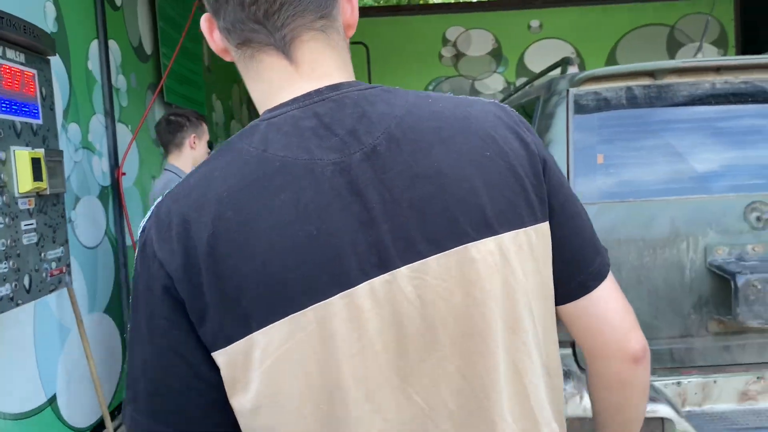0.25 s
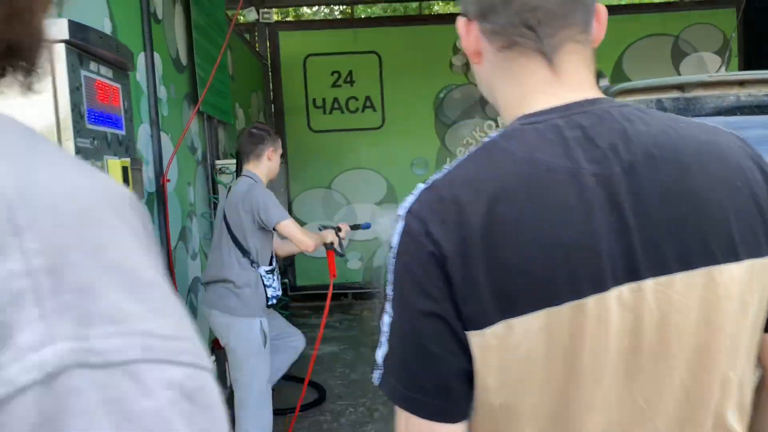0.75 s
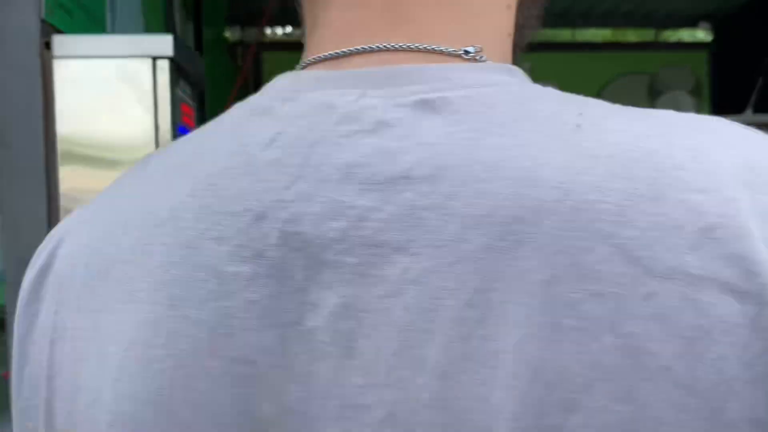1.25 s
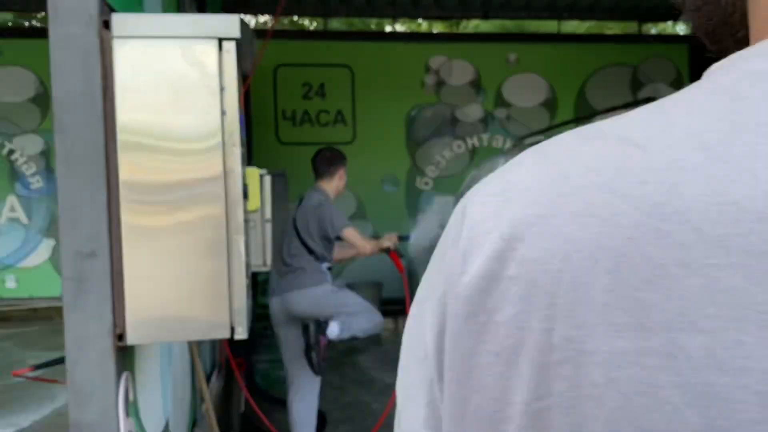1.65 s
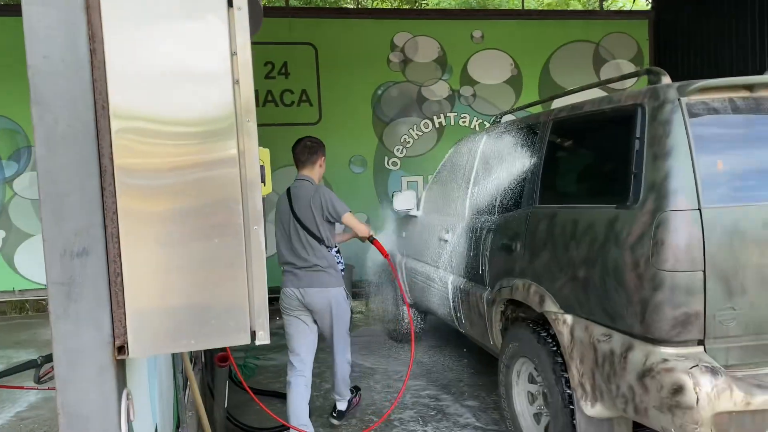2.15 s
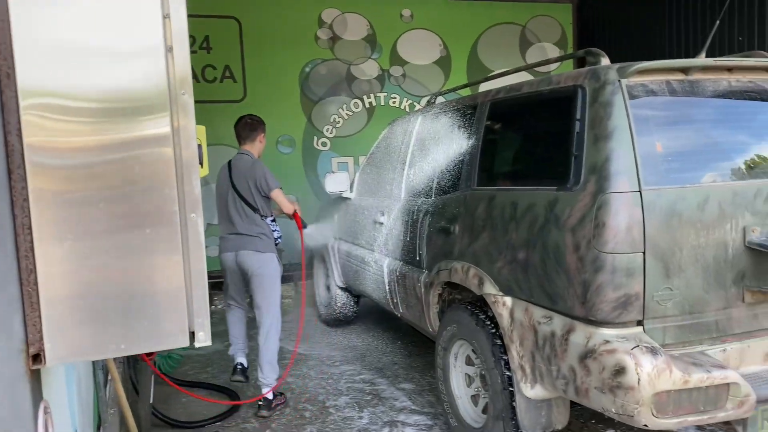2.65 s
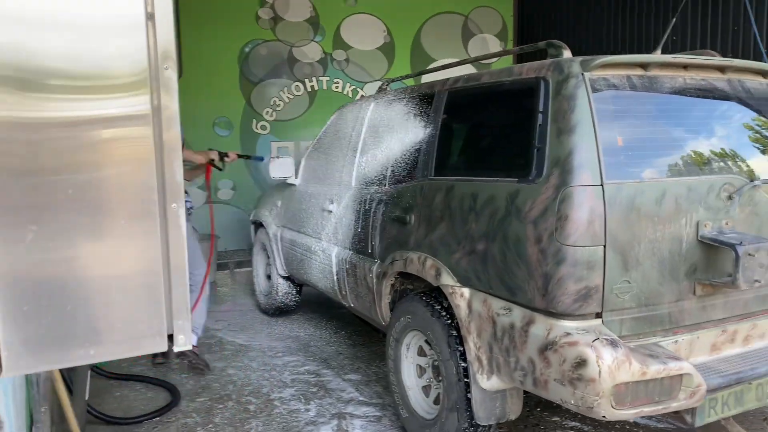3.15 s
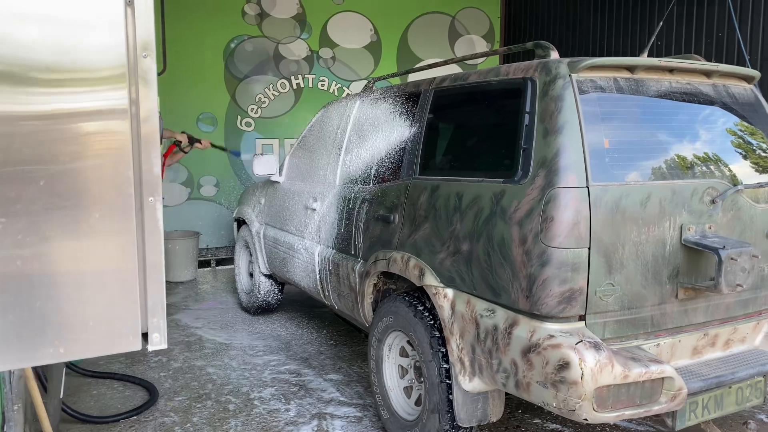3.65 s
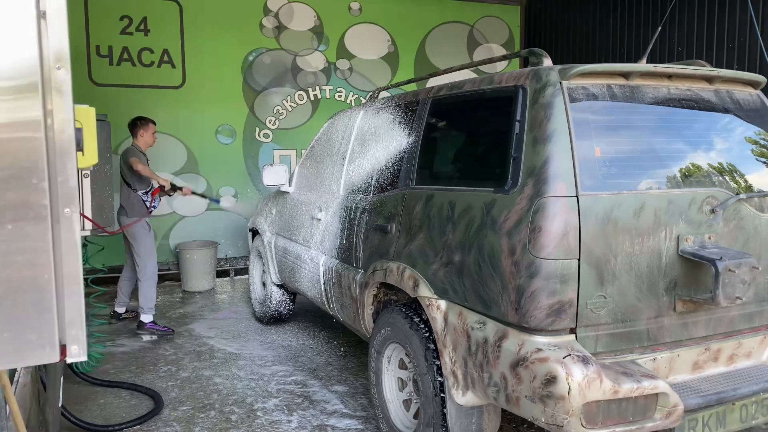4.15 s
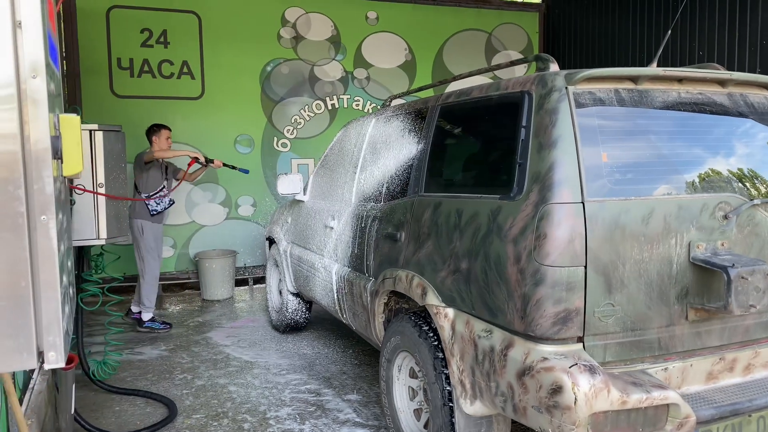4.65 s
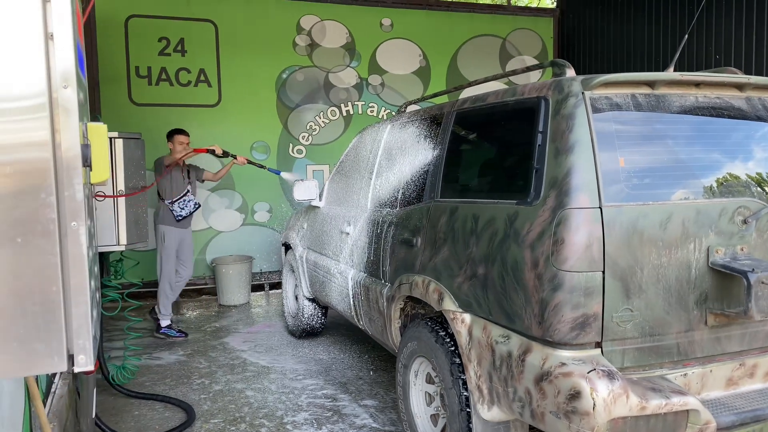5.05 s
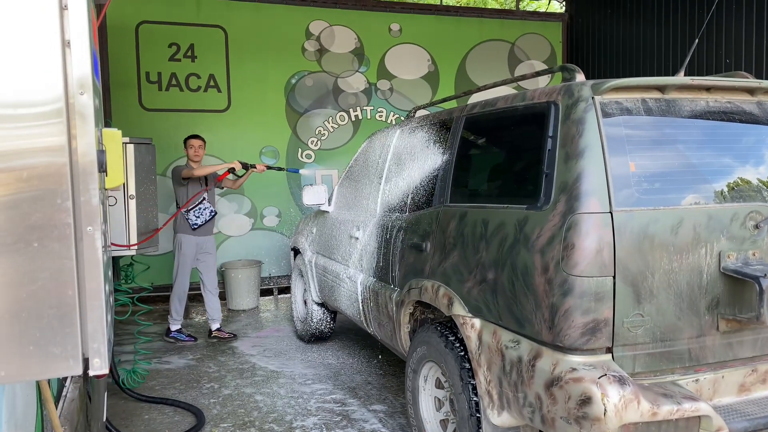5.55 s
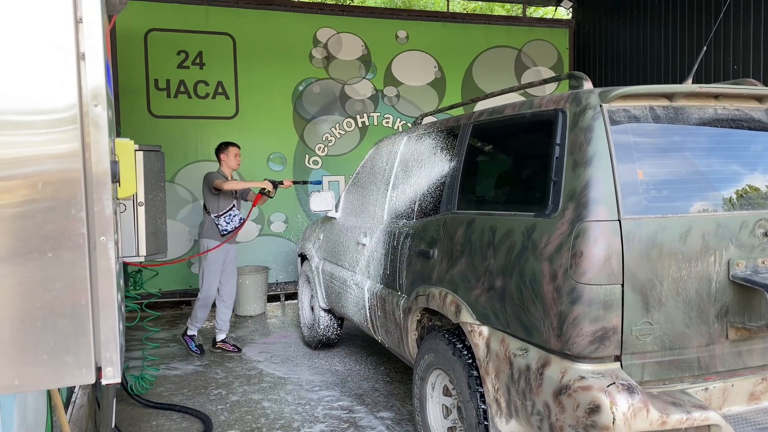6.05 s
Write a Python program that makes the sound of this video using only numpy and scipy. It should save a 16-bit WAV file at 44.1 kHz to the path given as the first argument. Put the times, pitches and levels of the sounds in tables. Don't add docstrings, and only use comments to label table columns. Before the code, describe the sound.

At an open self-service wash bay, a pressure lance sprays a car with a bright, dense hiss, fizzing at the nozzle and hooting faintly in its tube. A plunger pump thuds and hums beneath. The spray stops briefly early on, resumes for a long stretch, then cuts twice more near the end, the pump easing each time. Stereo phone pickup from several metres, with short wall reflections.

```python
import sys
import numpy as np
from scipy import signal
from scipy.io import wavfile
from scipy.ndimage import uniform_filter1d

SR = 44100
rng = np.random.default_rng(int(sys.argv[2]) if len(sys.argv) > 2 else 0)


def waveform_to_disk(signal):
    frames = np.transpose(np.atleast_2d(signal))
    scaled = np.clip(frames, -1, 1) * 32767
    samples = np.round(scaled).astype(np.int16)
    wavfile.write(sys.argv[1], SR, samples)


def ratio(d):
    e = np.asarray(d, float) / 20
    return 10 ** e


N = 278712

# (frequency [Hz], density [dB per Hz])
YARD_SPECTRUM = [(25, -45), (45, -12), (140, -4.5), (250, -8.5), (600, -19), (1400, -23), (4000, -30),
                 (8000, -36), (12000, -43), (13200, -70), (16000, -90)]
# (time [s], level [dB], length [s])
YARD_SWELLS = [
    (.08, 13, .14),
    (1.06, -5, .14),
    (6.05, 3, .2),
]
# (frequency [Hz], density [dB per Hz])
RUMBLE_SPECTRUM = [(25, -55), (42, -22), (70, -7), (140, -7), (200, 0), (400, -1.5), (850, -8.5),
                   (1800, -31.5), (6000, -36), (16000, -62)]
# (shaft order [1], level [dB])
PLUNGER_ORDERS = [(3, 0), (6, -34)]
# (shaft order [1], level [dB])
MOTOR_ORDERS = [(4, 0), (5, -1.2)]
# (shaft order [1], level [dB])
KNOCK_ORDERS = [(7, -4), (8, 1), (9, 0.5), (10, -2), (11, -9), (12, -4), (13, -16), (14, -11.5),
                (15, -16.5), (16, -24), (17, -5), (18, -16.5), (19, -17.5), (20, -11.5), (21, -16.5),
                (22, -15)]
# (lift [s], reseat [s], time to load up [s], surge just before [dB])
UNLOADS = [
    (.76, 1.14, .12, 0),
    (4.645, 4.86, .06, 3.5),
    (6.0, 6.3, .05, 3.5),
]
# (time [s], level [dB])
PUMP_PATH = [(0.0, 5), (.1, 4), (.2, 3), (.4, -1), (.6, 3), (.72, 2), (.82, 6), (1.06, -7), (1.17, 7),
             (1.3, 2), (2.3, 2.5), (3.3, -.5), (3.8, -1), (4.15, 1), (4.55, -1), (4.78, -4), (4.86, 2),
             (5.05, -2.5)]
# (time [s], level [dB], length [s])
MOTOR_SWELLS = [
    (.08, 4, .08),
    (1.08, -13, .17),
    (3.15, -10, .5),
    (4.62, 3, .15),
    (4.88, -11, .03),
]
# (time [s], peak [dB])
SPITS = [
    (4.842, -14),
    (6.308, -12),
]
# (time [s], peak [dB], frequency [Hz], t60 [s])
THUMPS = [
    (0.046, -20, 61, 0.34),
    (.13, -24, 64, 0.4),
    (4.879, -28, 57.5, .3),
    (5.899, -30, 421, 0.94),
    (5.9, -34, 644, 0.47),
    (6.02, -37, 473, 0.6),
    (6.09, -35, 328, 0.56),
    (6.16, -35, 353, .5),
]
# (open [s], let go [s], pressure missing at first [dB], time to build [s])
PULLS = [
    (-1.0, 0.765, -10, .05),
    (1.13, 4.503, -25, .085),
    (4.841, 5.855, -5, .04),
    (6.308, 7.0, -13, .015),
]
# (time [s], strength on panels [dB], tube pitch [Hz], panel hollowness [dB])
SWEEP = [(0.0, -21.5, 715, 2), (.23, -23.3, 735, 0), (.39, -26.7, 735, 2), (.52, -24.3, 737, 0),
         (.75, -25.7, 740, -2), (1.3, -27.2, 715, 3), (1.7, -26, 737, 0), (2.0, -24.8, 705, 0),
         (2.35, -23, 722, -1), (2.6, -24.5, 740, 0), (2.9, -24.2, 735, -.5), (3.38, -25.5, 697, 1),
         (4.1, -26.3, 712, 0), (4.5, -24, 712, -1), (4.9, -26.5, 712, 2), (5.1, -26, 715, 0),
         (5.6, -26.5, 713, 1), (5.9, -27, 665, 5.5)]
# (frequency [Hz], density [dB per Hz])
SPLASH_SPECTRUM = [(1120, -40), (1900, -10.5), (2640, 0.5), (2910, 2), (3220, -1), (4310, -1.5),
                   (5790, -12.5), (6600, -14.5), (8580, -27), (14500, -120)]
# (frequency [Hz], density [dB per Hz])
DRUM_SPECTRUM = [(490, -32), (830, -1), (1010, -5), (1170, -8.5), (1460, -4), (1720, -10), (1900, -10.5),
                 (2470, -21), (4180, -120)]
# (frequency [Hz], density [dB per Hz])
FIZZ_SPECTRUM = [(4000, -28), (5800, 5), (7000, 1.5), (9000, 5), (11000, 4.5), (13000, 3.5), (15000, 0.5),
                 (17000, -26.5)]
# (time [s], level [dB], length [s])
FIZZ_FLARES = [(1.43, 3, .05), (1.95, 4, .04), (3.0, 3, .08), (3.19, -7, .03), (3.28, 6, .07),
               (3.77, 8, .05), (4.13, 7, .12), (4.35, 5, .04), (4.85, 6, .03), (5.07, 5, .05),
               (5.8, 2, .08), (6.07, 6, .07), (6.31, 10, .008)]
# (time [s], level [dB], length [s])
HOOT_GULPS = [(.38, 6, .04), (.47, 8, .025), (.6, -3, .06), (1.67, 5, .09), (2.1, 6, .16), (2.5, 3, .1),
              (2.66, -7, .03), (2.84, 3, .05), (3.1, 3, .1), (3.56, 3, .04), (3.77, 4, .03), (4.16, 3, .06),
              (4.52, 11, .045), (4.88, 4, .04), (5.53, 4, .04), (5.84, 5, .04), (6.32, 12, .02)]
# (delay [s], gain [1])
WALLS = [(.0031, 0.21), (.0074, -0.22), (0.012, .3), (.0187, .25), (0.0253, -0.15), (.0371, 0.24)]
# (frequency [Hz], left-right likeness [1])
LIKENESS = [(60, 0.3), (200, 1.1), (400, 0.7), (700, 0.2), (1300, -0.3), (3000, 0.12), (5000, -0.28),
            (7000, .42), (8400, .6), (9300, .8), (11000, .97), (15000, .95)]
# (frequency [Hz], left minus right [dB])
BALANCE = [(60, 9), (130, 1.5), (290, -3), (640, 6), (1410, 0.5), (3100, 3), (6820, 4.5), (15000, -3)]

YARD_DB = -44.5
IDLE_HZ, SAG_HZ = 24.45, 0.6
IDLE_DB, LIFT_S, SURGE_S = -12.5, 0.06, 0.05
PLUNGER_DB, KNOCK_DB, MOTOR_DB, RUMBLE_DB = -32.5, -32.3, -40.5, -36.3
ROCK_DB = -45.5
KNOCK_LOAD, MOTOR_LOAD, RUMBLE_LOAD = 0.8, -0.25, 0.5
PLUNGER_PATH, MOTOR_PATH, RUMBLE_PATH = 0.3, 0.3, 0.7
KNOCK_LEAD_RAD = 2.4
KNOCK_ECHO = 0.75
BLEED_DB_PER_S, KNEE_S = 118, 0.025
FIZZ_SHARE, HOOT_SHARE, DRUM_SHARE = 1.45, 0.85, 0.72
FIZZ_DB, HOOT_DB, DRUM_DB = -11.5, -9.5, -12.5
PANELS_LEAD_S, PANELS_STEP_HZ = 0.0004606, 0
NOZZLE_LEAD_S, NOZZLE_STEP_HZ = -0.00025, 11020
TREBLE_HZ, TOP_HZ = 6000, 15750


def evened(x):
    return x / np.sqrt(np.mean(x ** 2) + 1e-20)


def read(points, hz):
    f, value = np.transpose(points)
    return np.interp(np.log(hz + 1), np.log(f + 1), value)


def add(mix, s, sound):
    part = mix[..., round(s * SR):][..., :sound.shape[-1]]
    part += sound[..., :part.shape[-1]]


def drift(hz, count):
    t = np.arange(0, N + 64, 64) / SR
    turns = np.geomspace(hz / 10, hz, 16)[:, None] * t + rng.random((count, 16, 1))
    wander = np.sin(2 * np.pi * turns).sum(1) / np.sqrt(8)
    return np.repeat(wander, 64, 1)[:, :N]


def swells(rows):
    t = np.arange(N) / SR
    return sum(db * np.exp(-((t - s) / length_s) ** 2) for s, db, length_s in rows)


def hiss(spectrum, patchy_db, flicker_db, size, aimed=1):
    frames, hz = 4 * N // size + 5, np.fft.rfftfreq(size, 1 / SR)
    a, b, c, d, patches = rng.standard_normal((frames, len(hz), 5)).T
    patches = uniform_filter1d(patches, size=size // 80, axis=0)
    patches = evened(uniform_filter1d(patches, size=8000 // size, axis=1))
    flicker = evened(uniform_filter1d(rng.standard_normal(frames), size=3))

    same = np.clip(read(LIKENESS, hz), 0, 1)[:, None]
    lead_s = np.where(hz < TREBLE_HZ, PANELS_LEAD_S, NOZZLE_LEAD_S)
    step_hz = np.where(hz < TREBLE_HZ, PANELS_STEP_HZ, NOZZLE_STEP_HZ)
    early = np.exp(2j * np.pi * (hz - step_hz) * lead_s * aimed)[:, None]
    right = a + 1j * b
    left = same * early * right + np.sqrt(1 - same ** 2) * (c + 1j * d)

    half_db = read(BALANCE, hz) / 2
    port_db = np.array([half_db, -half_db]) + read(spectrum, hz)
    z = np.array([left, right]) * ratio(port_db)[:, :, None]
    z *= ratio(patchy_db * patches + flicker_db * flicker)
    out = signal.istft(z, nperseg=size, noverlap=3 * size // 4)[1][:, :N]
    return out / np.sqrt(np.mean(out.mean(0) ** 2))


def yard():
    noise = hiss(YARD_SPECTRUM, 1.23, 1.2, size=1024, aimed=0)
    return ratio(YARD_DB + swells(YARD_SWELLS)) * noise


def pump_load_db():
    t, out = np.arange(N) / SR, np.zeros(N)
    for lift_s, reseat_s, build_s, surge_db in UNLOADS:
        lifted = np.clip((t - lift_s) / LIFT_S, 0, 1)
        lifted *= np.exp(-np.maximum(t - reseat_s, 0) / build_s)
        out += IDLE_DB * lifted + swells([(lift_s - SURGE_S, surge_db, SURGE_S)])
    return out


def shaft_lines(orders, turn, waver_db, lead_rad, echo):
    waver = ratio(waver_db * drift(6, count=len(orders)))
    out = np.zeros(N)
    for (order, db), w in zip(orders, waver):
        k = round(order)
        repeats = echo * np.cos(k * 2 * np.pi / 3)
        out += ratio(db) * w * np.cos(k * (turn + lead_rad) + repeats)
    return evened(out)


def pump():
    load_db = pump_load_db()
    path_db = np.interp(np.arange(N) / SR, *np.transpose(PUMP_PATH))
    loaded = uniform_filter1d(np.clip((load_db + 8) / 5, 0, 1), size=4000)
    shaft_hz = IDLE_HZ - SAG_HZ * loaded + 0.027 * drift(1.51, count=1)[0]
    turn = 2 * np.pi * np.cumsum(shaft_hz) / SR

    rumble_db = RUMBLE_DB + RUMBLE_LOAD * load_db + RUMBLE_PATH * path_db
    out = ratio(rumble_db) * hiss(RUMBLE_SPECTRUM, 2.5, 0.57, size=2048)
    out += ratio(ROCK_DB + 2.4 * drift(6.3, count=1)) * np.sqrt(2) * np.cos(2 * turn)

    plunger_db = PLUNGER_DB + load_db + PLUNGER_PATH * path_db
    out += ratio(plunger_db) * shaft_lines(PLUNGER_ORDERS, turn, 0.6, 0, 0)
    motor_db = MOTOR_DB + MOTOR_LOAD * load_db + MOTOR_PATH * path_db + swells(MOTOR_SWELLS)
    out += ratio(motor_db) * shaft_lines(MOTOR_ORDERS, turn, 1.5, 0, 0)
    knock_db = KNOCK_DB + KNOCK_LOAD * np.minimum(load_db, 0) + path_db
    out += ratio(knock_db) * shaft_lines(KNOCK_ORDERS, turn, 1.2, KNOCK_LEAD_RAD, KNOCK_ECHO)
    return out


def valve():
    out, t = np.zeros((2, N)), np.arange(20000) / SR
    for s, db in SPITS:
        air = uniform_filter1d(rng.standard_normal((2, len(t))), size=4)
        add(out, s, ratio(db - 7.5 - 60 * t / 0.16) * air)
    for s, db, hz, t60_s in THUMPS:
        envelope = ratio(db - 60 * t / t60_s) * np.minimum(t / 0.019, 1)
        add(out, s, envelope * np.sin(2 * np.pi * hz * t))
    return out


def nozzle_pressure_db():
    t, out = np.arange(N) / SR, np.zeros(N)
    for open_s, let_go_s, missing_db, build_s in PULLS:
        now = t[t >= open_s]
        bleed_db = BLEED_DB_PER_S * KNEE_S * np.logaddexp(0, (now - let_go_s) / KNEE_S)
        out[t >= open_s] = missing_db * np.exp((open_s - now) / build_s) - bleed_db
    return out


def bay(x):
    delays_s = np.transpose(WALLS)[0][:, None] + 0.00022 * drift(1.2, count=len(WALLS))
    at, out = np.arange(N), x.copy()
    for delay_s, (_, gain) in zip(delays_s, WALLS):
        source = at - np.round(delay_s * SR).astype(int)
        out += gain * x[:, np.clip(source, 0, N - 1)]
    return out / np.sqrt(1 + sum(gain ** 2 for _, gain in WALLS))


def resonate(x, hz, width_hz):
    turn = np.exp(2j * np.pi * np.cumsum(hz) / SR)
    r = np.exp(-np.pi * width_hz / SR)
    return 2 * (turn * signal.lfilter([(1 - r) ** 2], [1, -2 * r, r * r], x / turn)).real


def tube(hoot_hz):
    air = rng.standard_normal((2, N))
    air[1] += 0.17 * np.roll(air[0], round(PANELS_LEAD_S * SR))
    narrow = evened(resonate(air, hoot_hz + 10 * drift(5, count=1)[0], 62))
    wide = evened(resonate(air, hoot_hz, 260))
    return narrow + 0.87 * wide


def lance():
    s, *columns = np.transpose(SWEEP)
    jet_db, hoot_hz, hollow_db = (np.interp(np.arange(N) / SR, s, c) for c in columns)
    flow_db = nozzle_pressure_db()

    out = ratio(jet_db + flow_db) * bay(hiss(SPLASH_SPECTRUM, 1.42, 0.53, size=256))
    drum_db = jet_db + hollow_db + DRUM_DB + DRUM_SHARE * flow_db + 0.8 * drift(7, count=1)
    out += ratio(drum_db) * bay(hiss(DRUM_SPECTRUM, 1.45, 0.59, size=512))

    slugs_db = 1.2 * drift(12, count=1)
    fizz_db = jet_db + FIZZ_DB + FIZZ_SHARE * flow_db + swells(FIZZ_FLARES) + slugs_db
    out += ratio(fizz_db) * hiss(FIZZ_SPECTRUM, 1.6, 0.74, size=256)

    hoot_db = jet_db + HOOT_DB + HOOT_SHARE * flow_db + swells(HOOT_GULPS)
    out += ratio(hoot_db + [[1.5], [-5]]) * tube(hoot_hz)
    return out


def scene():
    return yard() + pump() + valve() + lance()


def band_limit(x):
    return signal.sosfilt(signal.butter(12, 17040, fs=SR, output="sos"), x)


def record(dry):
    mid_side = [dry.mean(0), (dry[0] - dry[1]) / 2]
    hz, t, z = signal.stft(mid_side, SR, nperseg=1024, noverlap=768)
    hz, z = hz[:512, None], z[:, :512]
    bands = (abs(z) ** 2).reshape(2, 128, 4, -1).sum(2)
    bands = uniform_filter1d(bands, size=6, axis=2)[:, :, ::4].repeat(4, 2)[:, :, :len(t)]
    fickle_db = 2.5 * rng.standard_normal((len(t) // 4 + 1, 32, 2)).T
    fickle_db = fickle_db.repeat(4, 1).repeat(4, 2)[:, :, :len(t)]
    strong = bands > bands[::-1] * ratio(-14 + fickle_db)
    keep = strong.repeat(4, 1) | (hz < 6600)
    z = np.pad(z * keep * (hz < TOP_HZ), ((0, 0), (0, 1), (0, 0)))
    mid, side = signal.istft(z, SR, nperseg=1024, noverlap=768)[1][:, :N]
    return band_limit(np.array([mid + side, mid - side]))


dry = scene()
out = record(dry)
waveform_to_disk(out)
```